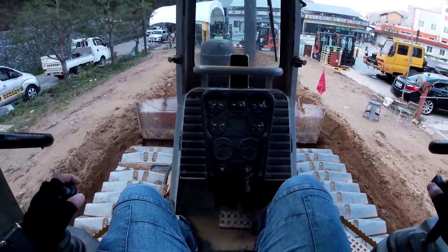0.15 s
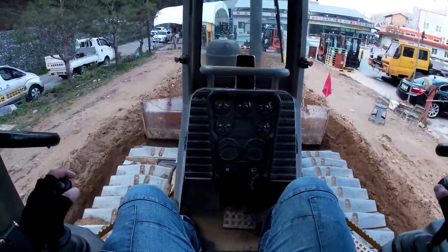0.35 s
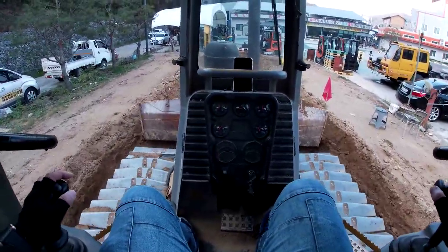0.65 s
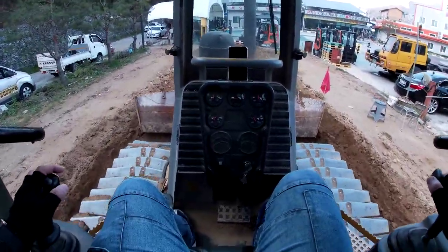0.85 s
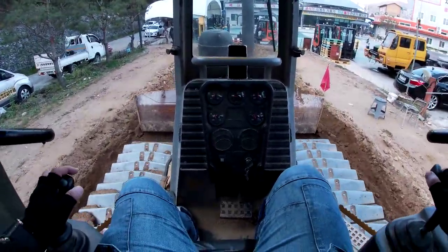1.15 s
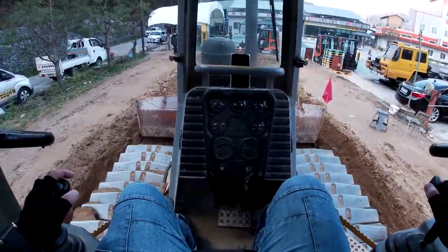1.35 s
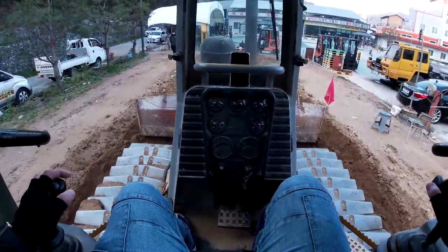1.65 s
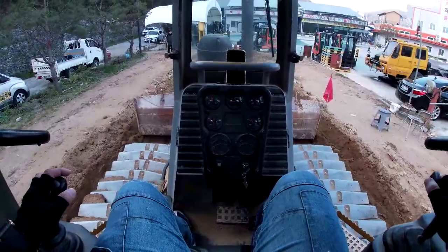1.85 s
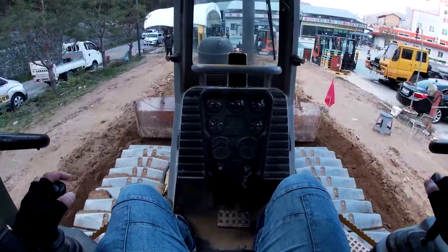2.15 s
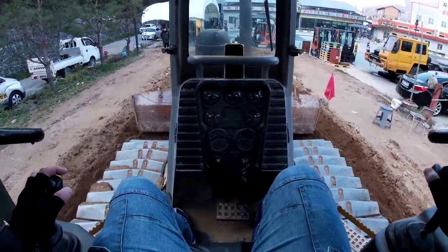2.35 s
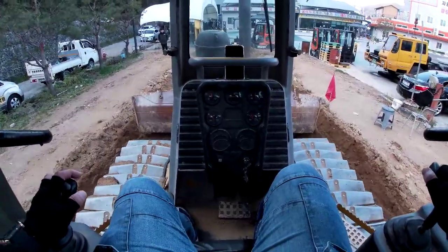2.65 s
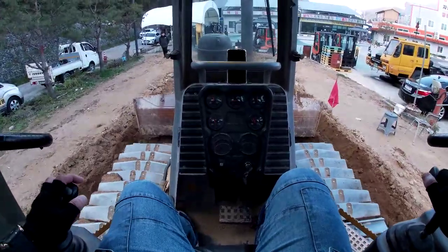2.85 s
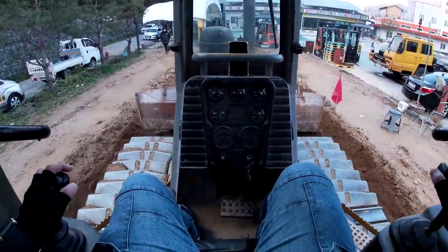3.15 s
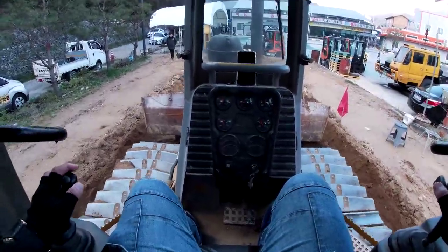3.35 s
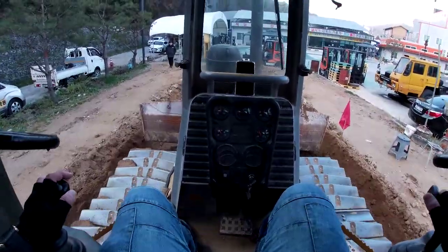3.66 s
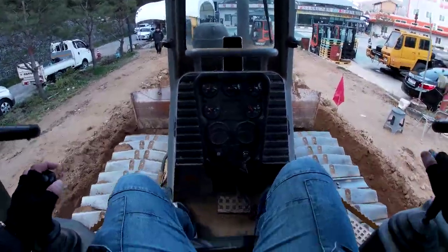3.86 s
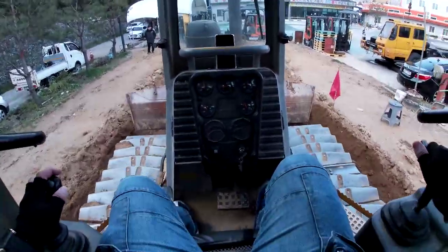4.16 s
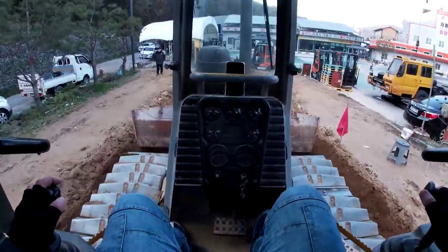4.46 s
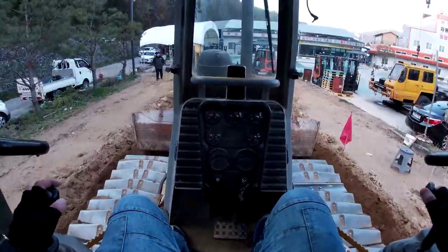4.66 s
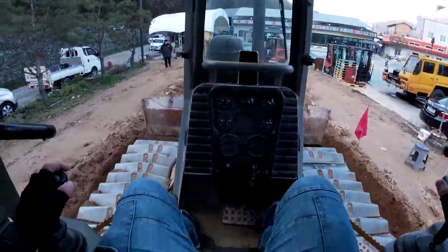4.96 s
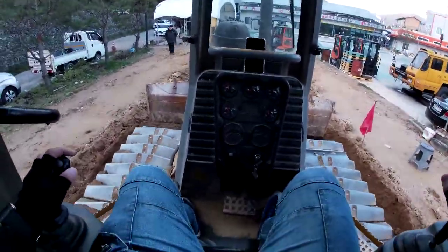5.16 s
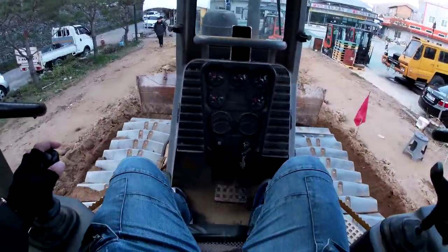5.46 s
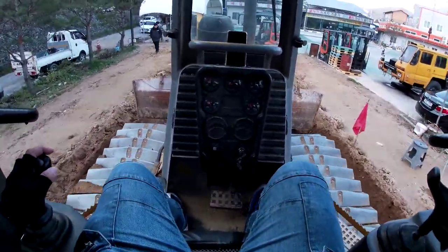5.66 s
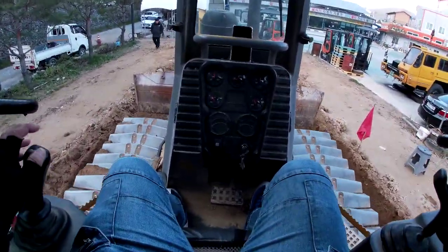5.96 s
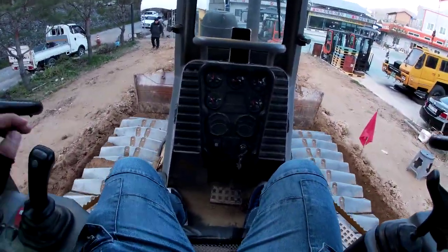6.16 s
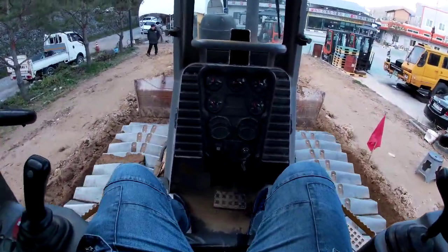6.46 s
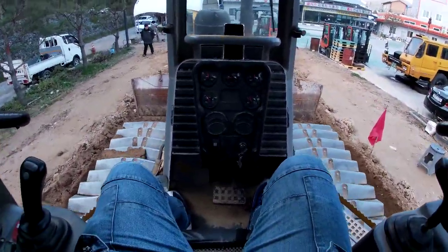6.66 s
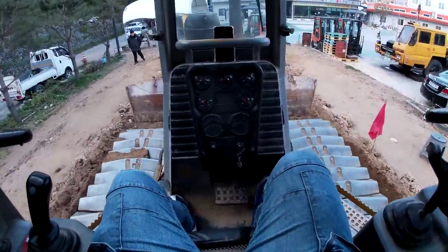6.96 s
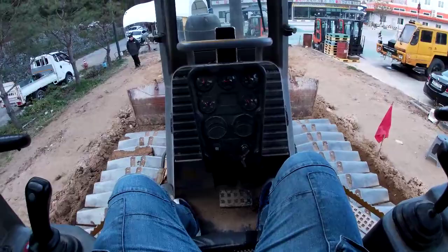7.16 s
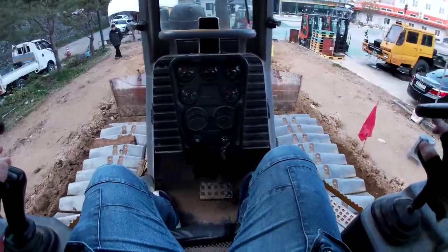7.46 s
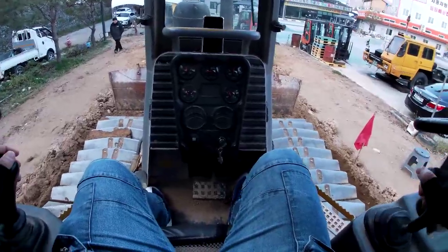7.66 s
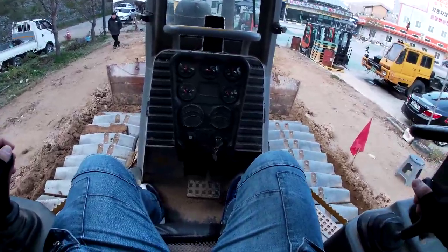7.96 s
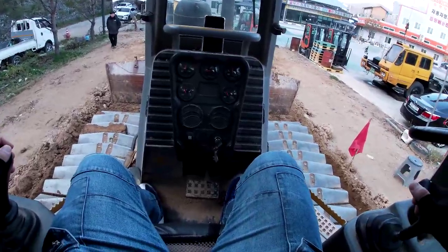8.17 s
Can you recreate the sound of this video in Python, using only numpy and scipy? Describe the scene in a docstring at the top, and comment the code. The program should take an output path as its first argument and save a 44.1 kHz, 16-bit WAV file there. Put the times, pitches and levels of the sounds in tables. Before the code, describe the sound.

Heard from the seat inside a crawler bulldozer, a diesel engine drones and clatters, repeatedly bogging and recovering as it pushes soil. The cab booms, thumps and rattles, with brief buzzes and growling resonances. Beneath this the tracks grind through earth, and their dry steel joints squeak and clink, most busily past the middle. Faint steady whines sit behind, and the engine drops towards idle at the end.

```python
"""Inside the cab of a crawler bulldozer pushing soil. The four-cylinder diesel bogs and recovers again
and again, sweeping its firing harmonics through the cab's resonances, and drops towards idle at the end.
Drone, clatter and fan air follow its speed and load. The tracks grind through soil and jolt and rattle
the cab; their dry steel joints squeak and clink. Faint, steady whines sit behind it all."""
import sys
import numpy as np
from scipy import signal
from scipy.fft import rfft, irfft
from scipy.io import wavfile
from scipy.ndimage import uniform_filter1d, minimum_filter1d

SR = 44100
rng = np.random.default_rng(int(sys.argv[2]) if len(sys.argv) > 2 else 0)


def master(y):
    """Save y as 16-bit WAV."""
    cut = np.clip(np.atleast_2d(y).T, -1, 1)
    pcm = np.round(cut * 32767)  # scale
    wavfile.write(sys.argv[1], SR, pcm.astype(np.int16))


N = 366471
TIME = np.arange(N) / SR
FREQS = np.fft.rfftfreq(N, 1 / SR)
CRUISE_HZ = 67  # firing rate


def undb(db):
    """Decibels to gain."""
    return 10 ** (np.asarray(db) / 20)


def unit(x):
    """Scale to rms 1."""
    return x / np.sqrt(np.mean(x ** 2))


def curves(table):
    """Each column after the first (seconds) as a line through time."""
    times_s, *columns = np.transpose(table)
    return [np.interp(TIME, times_s, column) for column in columns]


def swells(table, rise_share=0.2):
    """Gain through time of (start s, length s, dB) events, each a rounded rise and fall."""
    gain = 0
    for start_s, length_s, db in table:
        ramp = np.interp(TIME, [start_s, start_s + rise_share * length_s, start_s + length_s], [0, 1, 0])
        gain += undb(db) * np.sin(np.pi / 2 * ramp)
    return gain


def walk(rate_hz):
    """Smooth random curve, rms 1, with a bandwidth of about rate_hz."""
    return unit(irfft(rfft(rng.standard_normal(N)) * np.exp(-(FREQS / rate_hz) ** 2), N))


def colour(x, spectrum):
    """Filter by a (Hz, dB) spectrum that falls away beyond its ends; rms 1."""
    hz, db = np.transpose(spectrum)
    bins_hz = np.maximum(FREQS, 1)
    shape = undb(np.interp(np.log(bins_hz), np.log(hz), db))
    skirts = np.minimum(bins_hz / hz[0], 1) ** 2 * np.minimum(hz[-1] / bins_hz, 1) ** 4
    return unit(irfft(rfft(x) * shape * skirts, N))


def resonance(hz, modes):
    """Gain at hz of a set of (centre Hz, width Hz, dB) resonances."""
    return np.sqrt(sum(undb(db) ** 2 / (1 + (2 * (hz - f) / width) ** 2) for f, width, db in modes))


def ring(force, modes, top_hz):
    """A force rings a set of resonances, rolled off above top_hz."""
    response = unit(resonance(FREQS, modes) / (1 + (FREQS / top_hz) ** 4))
    return irfft(rfft(force) * response, N)


def firings(phase, decay_cycles=0.3, scatter_db=8.5):
    """A dying burst at each firing; four unequal cylinders, and no two blows alike."""
    index = phase.astype(int)
    cylinder_db = np.array([1.3, -1, 0.79, -1.2])[index % 4]
    chance = np.clip(rng.standard_normal(1024), -2, 2)[index % 1024]
    return unit(undb(cylinder_db + scatter_db * chance) * np.exp(-(phase % 1) / decay_cycles))


def pulsed(phase, spectrum, depth, geared_share=0):
    """Noise that pulses with the firings; the share from gears and valves repeats every crank turn."""
    turn = rng.standard_normal(1024)
    geared = unit(np.interp(phase / 2, np.arange(len(turn)) / len(turn), turn, period=1))
    force = np.sqrt(geared_share) * geared + np.sqrt(1 - geared_share) * rng.standard_normal(N)
    return colour(force * (10.5 + depth * firings(phase)), spectrum)


def grit(per_s=20, low_hz=3500, high_hz=6400, floor_db=-58, rise_s=0.001, decay_s=0.006):
    """Small stones pinched by the tracks chip off with faint, bright pings."""
    out, age_s = np.zeros(N), np.arange(SR // 20) / SR
    envelope = np.minimum(age_s / rise_s, 1) * np.exp(-age_s / decay_s)
    for when, pitch, size in rng.random((int(per_s * N / SR), 3)):
        start = int(when * (N - len(age_s)))
        hz = low_hz + pitch * (high_hz - low_hz)
        db = floor_db - 1.6 * np.log(1 - size)
        out[start:start + len(age_s)] += undb(db) * np.sin(2 * np.pi * hz * age_s) * envelope
    return out


# Taps in the cab. Each row: start in seconds, level in dB.
TICKS = [(7.573, -44), (7.664, -33.5)]
# The tapped metal. Each row: frequency in Hz, gain in dB, decay in seconds.
TICK_MODES = [(3236, -1, .003), (5300, 0, 0.003), (5640, -9, .003), (7500, -20, .003), (9845, -18, 0.0045)]

def ticks():
    """A small metal part taps its stop and rings for a few milliseconds."""
    out = np.zeros(N)
    for start_s, level_db in TICKS:
        age_s = np.maximum(TIME - start_s, 0)
        for hz, db, decay_s in TICK_MODES:
            out += undb(level_db + db) * np.sin(2 * np.pi * hz * age_s) * np.exp(-age_s / decay_s)
    return out


# Steady whines. Each row: pitch in Hz, early level in dB, late level in dB, fade start in seconds.
WHINE_TONES = [(599, -39, -49, 4.3), (804, -52, -47, 5.35), (1523, -53, -53, 7.4), (2400, -55.5, -62, 9.1)]
# Extra tones near idle. Each row: pitch in Hz, level in dB.
IDLE_TONES = [(701, -46), (732, -41)]

def whine(firing_hz, fade_s=0.23, idle_hz=48):
    """Thin, rasping whines hold their pitch as the engine speed changes; two more join near idle."""
    def tone(hz):
        drifting_hz = hz * (1 + 0.004 * walk(14.647))
        angle = 2 * np.pi * np.cumsum(drifting_hz) / SR + 0.4 * walk(36)
        return unit(np.sin(angle) * undb(2.5 * walk(9)))

    out = 0
    for hz, early_db, late_db, start_s in WHINE_TONES:
        out += tone(hz) * undb(np.interp(TIME - start_s, [0, fade_s], [early_db, late_db]))
    idling = np.clip((idle_hz - firing_hz) / 2, 0, 1)
    return out + idling * sum(tone(hz) * undb(db) for hz, db in IDLE_TONES)


def grinding(spectrum, grain_db):
    """Friction noise, coloured by what is rubbed; grain_db roughens it into tiny cracks."""
    return colour(rng.standard_normal(N) * undb(grain_db * walk(600)), spectrum)


# Surges through the soil. Each row: start in seconds, length in seconds, level in dB.
SOIL_SURGES = [(-.2, 0.45, -53), (.4, 0.53, -52.5), (1.25, 0.43, -50), (1.85, 0.64, -57.5),
               (2.57, 0.7, -50), (3.27, 0.6, -48.5), (4.15, 0.6, -51), (4.45, 0.94, -53), (5.42, 1.1, -51),
               (6.8, 0.79, -50.5), (7.6, 1.17, -72)]
# Track link clatter. Each row: frequency in Hz, relative density in dB.
LINK_SPECTRUM = [(900, -13), (1200, 1.5), (1450, 1.5), (1750, -6), (2100, -11), (2600, -2.5), (3100, -17.5),
                 (3800, -25.5)]

def soil(links_over_hiss_db=8.5, jostle_db=2):
    """Blade and shoes grind through soil with a hiss, and the links clatter in the same surges."""
    hiss = grinding(HISS_SPECTRUM, grain_db=1.5)
    links = grinding(LINK_SPECTRUM, grain_db=1) * unit(undb(jostle_db * walk(25)))
    return (hiss + links * undb(links_over_hiss_db)) * swells(SOIL_SURGES, rise_share=0.36)


# Track scrapes. Each row: start in seconds, length in seconds, level in dB.
SCRAPES = [(3.012, 0.045, -48), (5.55, 0.088, -58), (5.66, .12, -58), (5.85, 0.14, -52), (5.985, .07, -49),
           (6.1, 0.041, -57)]
# The scraped steel. Each row: frequency in Hz, relative density in dB.
STEEL_SPECTRUM = [(2800, -1), (4300, 4), (5500, 2), (7000, -7), (8800, -5), (11000, -16), (13000, -16),
                  (15000, -36)]

def scrapes():
    """Steel slides on steel with a short, bright hiss."""
    return grinding(STEEL_SPECTRUM, grain_db=0) * swells(SCRAPES, rise_share=0.37)


# Track joint squeaks. Each row: start in seconds, length in seconds, pitch in Hz, glide in Hz,
# fundamental in dB, octave in dB.
SQUEAKS = [(0.027, 0.13, 4200, 4, -75, -71), (0.756, 0.12, 4500, -36, -66, -57),
           (0.805, 0.13, 523, 76, -29, -61), (1.603, 0.17, 5440, -300, -41, -64),
           (5.453, 0.022, 3330, 200, -49, -70), (5.452, 0.083, 4360, 56, -39.5, -47.5),
           (5.52, .09, 3200, 950, -49, -65), (5.568, 0.08, 4280, 262, -41.5, -54),
           (5.686, 0.06, 4320, 147, -44, -57), (5.726, 0.019, 4720, -250, -38, -52),
           (5.73, 0.069, 4480, -38, -55, -45), (5.855, 0.03, 4120, -40, -44, -66),
           (5.885, 0.05, 4394, 40, -42.5, -73), (5.897, 0.058, 7120, 270, -41, -74),
           (5.951, 0.025, 4170, -100, -42.5, -68), (5.987, 0.061, 4453, 0, -46, -68),
           (5.999, 0.058, 7384, -180, -45, -80), (6.102, .04, 4160, 67, -58, -61),
           (6.403, .04, 5650, -60, -48, -80)]

def squeaks(rasp_rad=0.25, flutter_db=2.4, third_re_octave_db=-28):
    """Dry steel sticks and slips: short, rasping tones of three partials."""
    out, wobble, slip = np.zeros(N), walk(110), walk(220)
    flutter = unit(undb(flutter_db * walk(70)))
    for start_s, length_s, hz, glide_hz, fundamental_db, octave_db in SQUEAKS:
        span = (TIME >= start_s) & (TIME < start_s + length_s)
        progress = (TIME[span] - start_s) / length_s
        pitch_hz = (hz + glide_hz * progress) * (1 + 0.006 * wobble[span])
        angle = 2 * np.pi * np.cumsum(pitch_hz) / SR + rasp_rad * slip[span]
        partials_db = fundamental_db, octave_db, octave_db + third_re_octave_db
        tone = sum(undb(db) * np.sin(k * angle) for k, db in enumerate(partials_db, 1))
        out[span] += np.sqrt(2) * tone * np.sin(np.pi * progress) ** 2 * flutter[span]
    return out


# Shoes on stones. Each row: peak time in seconds, level in dB, decay in seconds.
CLINKS = [(.14, -50, .02), (1.83, -46, .02), (1.91, -48, 0.021), (4.02, -47, 0.0083), (4.235, -42.5, .018),
          (5.56, -49, 0.02), (5.625, -43, 0.03), (5.866, -45, 0.049), (5.995, -44, 0.027),
          (6.116, -50, 0.019), (6.4, -46, 0.068)]
# Track shoe resonances. Each row: centre in Hz, width in Hz, relative gain in dB.
SHOE_MODES = [(1360, 100, -1.5), (3330, 360, 9), (4200, 370, 7), (5400, 960, 7), (6300, 400, -8),
              (9900, 1200, -9), (13000, 900, -25)]

def clinks(rise_s=0.008, grain_db=3):
    """Stones crush in bursts of tiny cracks that ring the steel shoes."""
    envelope = 0
    for peak_s, db, decay_s in CLINKS:
        attack = np.clip((TIME - peak_s) / rise_s + 1, 0, 1)
        envelope += undb(db) * attack * np.exp(-np.maximum(TIME - peak_s, 0) / decay_s)
    cracks = unit(rng.standard_normal(N) * undb(grain_db * walk(500)))
    return ring(envelope * cracks, SHOE_MODES, top_hz=12000)


def crunch(blows, rise_s, decay_s):
    """Force of heavy steel slapping home: a noise burst at each (start s, dB)."""
    envelope = 0
    for start_s, db in blows:
        attack = np.clip((TIME - start_s) / rise_s, 0, 1)
        envelope += undb(db) * attack * np.exp(-np.maximum(TIME - start_s - rise_s, 0) / decay_s)
    return envelope * rng.standard_normal(N)


# Track frame resonances. Each row: centre in Hz, width in Hz, relative gain in dB.
FRAME_MODES = [(1296, 85, -4), (1780, 70, -7), (2280, 120, -20), (3130, 220, -16), (5300, 650, -24)]

def clank(start_s=3.02, db=-35):
    """One heavy link slaps home and rings the track frame."""
    return ring(crunch([(start_s, db)], rise_s=0.018, decay_s=0.012), FRAME_MODES, top_hz=4500)


# Floor plate knocks. Each row: start in seconds, level in dB.
KNOCKS = [(3.885, -34), (4.01, -31), (5.24, -37), (6.42, -34), (6.51, -37), (7.2, -27), (8.13, -29)]
# Plate resonances. Each row: centre in Hz, width in Hz, relative gain in dB.
PLATE_MODES = [(660, 50, -3.5), (700, 63, 1.5), (830, 46, -7)]

def knocks():
    """Loose floor plates knock and ring dully."""
    return ring(crunch(KNOCKS, rise_s=0.0051, decay_s=0.027), PLATE_MODES, top_hz=1100)


def in_cab(x, decay_s=0.012, wet_db=-11):
    """Glass and steel close by add a short, dense tail."""
    age_s = np.arange(SR // 10) / SR
    tail = rng.standard_normal(len(age_s)) * np.exp(-age_s / decay_s)
    reflections = signal.fftconvolve(x, tail / np.linalg.norm(tail))[:N]
    return (x + undb(wet_db) * reflections) / np.hypot(1, undb(wet_db))


def limited_swing(x, steadiness):
    """Mounts and bolts let a part swing only so far, which evens out its motion."""
    swing = np.sqrt(uniform_filter1d(x ** 2, SR // 12) + 1e-6)
    return unit(x / swing ** steadiness)


# Bursts of rattling. Each row: start in seconds, length in seconds, level in dB.
RATTLES = [(.8, 0.2, -33), (3.0, 0.19, -29), (3.84, 0.18, -27.5), (4.85, 0.16, -28), (5.8, 0.63, -31),
           (6.32, 0.2, -28), (8.2, 0.22, -35)]
# Loose fittings. Each row: frequency in Hz, relative density in dB.
FITTING_SPECTRUM = [(350, -29), (480, -7), (545, 6), (600, -1.5), (680, -5), (750, -11.5), (820, -9),
                    (920, -27), (1300, -28.5)]

def rattle(firing_hz, phase, cruise_db=-32, db_per_hz=0.16):
    """Loose fittings rattle with the firings, harder in bursts, less as the engine slows."""
    steady = undb(cruise_db + db_per_hz * (firing_hz - CRUISE_HZ) + 0.03 * walk(13))
    fittings = limited_swing(pulsed(phase, FITTING_SPECTRUM, depth=0.46), steadiness=0.21)
    return fittings * np.hypot(steady, swells(RATTLES))


# Panel buzzes. Each row: start in seconds, length in seconds, level in dB.
BUZZES = [(.58, 0.11, -27), (.87, 0.17, -19), (5.22, 0.15, -19), (6.26, 0.16, -23)]
# The loose panel. Each row: frequency in Hz, relative density in dB.
BUZZ_SPECTRUM = [(270, -30), (320, 2), (355, 3), (400, -24)]

def buzz(phase):
    """One loose panel buzzes briefly at its resonance."""
    return limited_swing(pulsed(phase, BUZZ_SPECTRUM, depth=1.5), steadiness=0.75) * swells(BUZZES)


# Thumps from blade and tracks. Each row: start in seconds, length in seconds, level in dB.
THUMPS = [(.6, 0.11, -23), (2.58, 0.31, -23), (2.94, 0.23, -21), (3.37, 0.11, -18.5), (3.94, .15, -20.5),
          (4.93, 0.17, -19.5), (5.21, 0.13, -25), (6.27, 0.17, -18), (7.36, 0.22, -21)]
# Cab panels. Each row: frequency in Hz, relative density in dB.
PANEL_SPECTRUM = [(80, -14), (115, -9), (145, 2), (175, -2.5), (240, -0.5), (300, 0.5), (370, -1),
                  (440, -7), (485, -14.5), (700, -43)]

def rumble(firing_hz, phase, cruise_db=-21, db_per_hz=-0.02, dull_hz=350):
    """Cab panels boom with firings and thumps; a slow engine's softer blows stir the high panels less."""
    steady = undb(cruise_db + db_per_hz * (firing_hz - CRUISE_HZ) - 0.08 * walk(2.5))
    panels = limited_swing(pulsed(phase, PANEL_SPECTRUM, depth=0.33), steadiness=0.32)
    lows = irfft(rfft(panels) / (1 + (FREQS / dull_hz) ** 8), N)
    brightness = np.interp(firing_hz, [50, 68], [0.45, 1])
    return (lows + brightness * (panels - lows)) * np.hypot(steady, swells(THUMPS))


# Jolts from the tracks. Each row: start in seconds, length in seconds, level in dB.
JOLTS = [(.17, 0.18, -25), (.38, 0.57, -19.5), (.96, 0.25, -16.5), (1.6, 0.16, -15.5), (1.8, .17, -18),
         (2.32, 0.27, -18), (3.05, 0.23, -24), (3.6, .16, -28), (3.82, 0.3, -17), (4.47, 0.4, -22),
         (4.86, 0.19, -15.5), (5.18, 0.26, -16.5), (5.9, 0.13, -13), (6.53, 0.21, -13), (7.14, 0.14, -25),
         (7.37, 0.15, -19.5), (8.04, 0.21, -15.5)]
# The cab on its mounts. Each row: frequency in Hz, relative density in dB.
SHAKE_SPECTRUM = [(20, -14.5), (33, -16), (44, -0.5), (51, 2.5), (60, 1), (72, -7), (85, -6.5),
                  (115, -24.5), (170, -34.5)]

def shake(ride_db=-21.5, waver_db=2):
    """The cab shakes on its mounts, harder as the tracks drop over uneven ground."""
    ride = undb(ride_db + waver_db * walk(25))
    motion = limited_swing(colour(rng.standard_normal(N), SHAKE_SPECTRUM), steadiness=0.93)
    return motion * np.hypot(ride, swells(JOLTS))


# Cab howls. Each row: start in seconds, length in seconds, harmonic number, level in dB.
HOWLS = [(0.563, 0.29, 6, -30.5), (1.17, 0.25, 3, -28), (1.267, 0.18, 5, -27.5), (1.28, 0.35, 6, -29),
         (1.335, .14, 2, -28.5), (1.892, 0.16, 3, -31), (2.0, 0.48, 6, -31), (2.55, 0.14, 3, -22),
         (2.555, .14, 4, -32), (2.597, 0.14, 5, -23), (2.653, 0.31, 2, -23.5), (2.713, .31, 6, -19),
         (3.012, 0.23, 4, -25), (3.298, .16, 3, -23), (3.315, 0.16, 5, -24), (3.39, 0.47, 6, -22.5),
         (4.525, 0.31, 6, -22), (4.551, .14, 2, -23.5), (4.83, 0.2, 6, -20.5), (5.4, 0.45, 4, -34),
         (5.68, 0.27, 6, -30), (6.1, 0.97, 6, -34), (6.719, 0.76, 4, -29.5), (7.329, 0.41, 3, -32)]

def howl(phase):
    """Single firing harmonics set the cab howling; unequal cylinders roughen each howl into a growl."""
    out = 0
    for order in range(2, 7):
        events = [(s, length_s, db) for s, length_s, harmonic, db in HOWLS if round(harmonic) == order]
        roughness = order / 6
        tone = np.sin(2 * np.pi * order * phase + 0.36 * roughness * walk(45))
        flutter = undb(2.6 * roughness * walk(40))
        lope = 1 + 0.5 * roughness * np.sin(np.pi * phase / 2)  # once per four firings
        out += unit(tone * flutter * lope) * swells(events, rise_share=0.3)
    return out


# Cab resonances. Each row: centre in Hz, width in Hz, relative gain in dB.
CAB_MODES = [(89, 3.7, -0.5), (140.8, 14, -1), (195, 48, 0.5), (257.8, 14.5, 5), (312, 44, -21.5),
             (356, 18.4, 2.5), (429, 20, -4), (593, 30, -18)]

def drone(firing_hz, phase, uneven_db=-15, waver_db=1.7, jitter_rad=0.13, bark_db=5, muffler_hz=480):
    """Firing harmonics stand out as they cross cab resonances; unequal cylinders add lines between."""
    rise_hz_per_s = np.gradient(uniform_filter1d(firing_hz, SR // 10)) * SR
    pulling = np.clip(rise_hz_per_s / 80, 0, 1)
    out, power = 0, 0
    for half_order in range(4, 20):
        order = half_order / 2
        muffler = 1 / np.sqrt(1 + (order * firing_hz / muffler_hz) ** 16)
        db = uneven_db * (half_order % 2) + waver_db * walk(13)
        db += bark_db * pulling * (order == 3)  # full fuel makes the third harmonic bark
        db -= 9 * max(order - 6, 0)  # the pulse has little above its sixth harmonic
        gain = resonance(order * firing_hz, CAB_MODES) * muffler * undb(db)
        out += gain * np.sin(2 * np.pi * order * phase + jitter_rad * walk(14))
        power += gain ** 2 / 2
    return out / np.sqrt(power)


# Low boom in the cab. Each row: firing rate in Hz, level in dB.
BOOM_LEVELS = [(44, -28), (49, -30), (56, -18), (62, -17.5), (66, -16.5), (73, -14.5)]
# Brief dips in its level. Each row: start in seconds, length in seconds, depth in dB.
LEVEL_DIPS = [(0.927, 0.3, -10), (1.587, 0.21, -9), (2.42, .15, -6), (3.062, 0.21, -8), (3.837, 0.26, -17),
              (4.907, 0.11, -5), (6.581, 0.33, -5.5), (7.318, .15, -18)]

def boom(firing_hz, phase, waver_db=1.5):
    """A low boom at the firing rate; its level dips briefly now and then."""
    db = np.interp(firing_hz, *np.transpose(BOOM_LEVELS)) + waver_db * walk(4.7)
    for start_s, length_s, dip_db in LEVEL_DIPS:
        db += dip_db * np.sin(np.pi * np.clip((TIME - start_s) / length_s, 0, 1))
    return np.sqrt(2) * np.sin(2 * np.pi * phase) * undb(db)


# Engine load. Each row: time in seconds, clatter and fan gain in dB, drone gain in dB.
LOAD = [(0, 2.3, -0.5), (.5, 2.1, 1.5), (.82, 2, -4.5), (1.1, 0.5, -6), (1.42, -2.2, -2), (1.57, 1.5, -4),
        (1.77, 0.5, -0.5), (2.0, 0, -2.5), (2.42, 0, -4.5), (2.54, 1.5, -11), (2.72, -0.3, 1),
        (2.88, 0.5, -3), (3.13, -.5, -3), (3.26, 0.5, -6.5), (3.52, -1.5, -1.5), (3.9, 1, 0.5),
        (4.12, 0, -2.5), (4.25, -1, -2.5), (4.45, -1.5, -0.5), (4.97, 0.5, -0.5), (5.15, -3.5, -20),
        (5.28, -2, -10), (5.55, 0, -3.5), (5.85, -0.8, -0.5), (6.35, 1.5, -4.5), (6.7, -1, -1),
        (7.22, -0.5, -3.5), (7.6, 0.7, -1.5), (7.9, 4.5, 1), (8.05, 4, -29), (8.31, 6, -4)]
# Engine block clatter. Each row: frequency in Hz, relative density in dB.
BLOCK_SPECTRUM = [(700, -8.5), (850, -2), (910, -3.5), (1150, -3), (1350, -2), (1520, -1.5), (1630, -6.5),
                  (1950, -9.5), (2200, -10), (2390, -9), (2500, -12), (2650, -10), (3200, -19.5),
                  (4100, -32)]
# Hiss of fan air, also of soil. Each row: frequency in Hz, relative density in dB.
HISS_SPECTRUM = [(2200, -25.5), (3000, 4), (3700, -0.5), (4400, 0), (5400, -1), (6300, -7.5), (7200, -14.5),
                 (8600, -16), (10500, -22), (13000, -28.5), (15500, -46)]

def engine(firing_hz, phase, fuel_cut_hz_per_s=-65, full_fuel_hz_per_s=54):
    """Drone, combustion clatter and fan air follow speed and load, and bite as the engine pulls."""
    load_db, drone_load_db = curves(LOAD)
    rise_hz_per_s = np.gradient(uniform_filter1d(firing_hz, SR // 8)) * SR
    coasting = np.clip(rise_hz_per_s / fuel_cut_hz_per_s, 0, 1)
    pulling = np.clip(rise_hz_per_s / full_fuel_hz_per_s, 0, 1)

    def gain(cruise_db, db_per_hz, coast_db, pull_db):
        speed_db = db_per_hz * (firing_hz - CRUISE_HZ)
        return undb(cruise_db + speed_db + coast_db * coasting + pull_db * pulling)

    hum = drone(firing_hz, phase) * undb(drone_load_db + 1.1 * walk(26))
    clatter = pulsed(phase, BLOCK_SPECTRUM, depth=0.98, geared_share=0.24) * undb(load_db)
    fan_air = pulsed(phase, HISS_SPECTRUM, depth=0.7, geared_share=0.15) * undb(load_db)
    return (hum * gain(cruise_db=-20.5, db_per_hz=0.01, coast_db=-3.5, pull_db=0.5)
            + clatter * gain(cruise_db=-37.5, db_per_hz=0.27, coast_db=-2, pull_db=1.3)
            + fan_air * gain(cruise_db=-50, db_per_hz=0.24, coast_db=0, pull_db=2))


# Engine speed, sagging as the blade bites. Each row: time in seconds, firing rate in Hz.
SPEED = [(0, 67.1), (.46, 65.46), (.67, 70.5), (.9, 65.1), (1.16, 55.25), (1.3, 68.2), (1.42, 72.5),
         (1.64, 68.4), (1.87, 56.33), (2.07, 69.7), (2.17, 68.2), (2.3, 63.4), (2.57, 57.17), (2.7, 70.8),
         (2.79, 74.55), (2.91, 72.85), (3.08, 65.9), (3.28, 62.7), (3.46, 72.7), (3.7, 72.2), (3.84, 67.2),
         (4.03, 65.22), (4.16, 59.7), (4.33, 70.35), (4.5, 73.27), (4.63, 75.57), (4.79, 71.02),
         (4.96, 73.5), (5.05, 71.53), (5.2, 70.8), (5.39, 62.92), (5.53, 66.9), (6.15, 69), (6.28, 71.4),
         (6.56, 70.8), (6.7, 66.35), (7.33, 66.03), (7.7, 53.65), (7.97, 43.04), (8.31, 46.26)]

def scene():
    """Engine, cab and tracks as heard from the seat."""
    firing_hz, = curves(SPEED)
    phase = np.cumsum(firing_hz) / SR  # counts firings, two per crank turn
    diesel = boom(firing_hz, phase) + engine(firing_hz, phase) + howl(phase)
    cab = whine(firing_hz) + shake() + rumble(firing_hz, phase) + buzz(phase) + rattle(firing_hz, phase)
    tracks = soil() + scrapes() + in_cab(squeaks() + clinks()) + clank()
    return (diesel + cab + tracks + knocks() + grit() + ticks())[None]


def record(dry, knee=0.47, ratio=3.2, top_hz=15500):
    """A limiter eases the highest peaks down, and the top is cut."""
    hold = SR // 60
    wanted = np.minimum(1, knee / (np.abs(dry) + 1e-9)) ** (1 - 1 / ratio)
    gain = uniform_filter1d(minimum_filter1d(wanted, hold), hold)
    return signal.sosfilt(signal.ellip(8, 0.2, 70, top_hz, fs=SR, output="sos"), dry * gain)


dry = scene()
out = record(dry)
master(out)
```